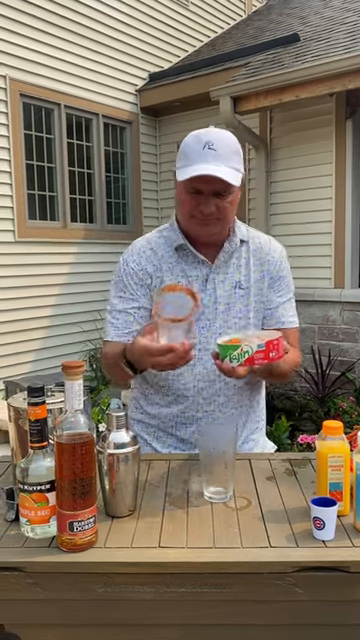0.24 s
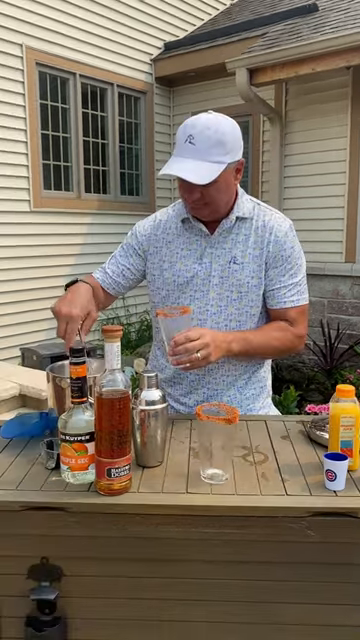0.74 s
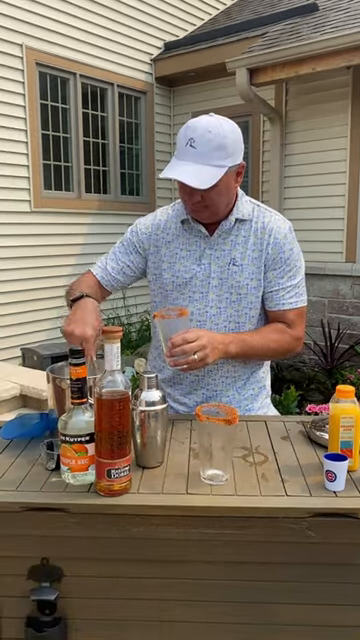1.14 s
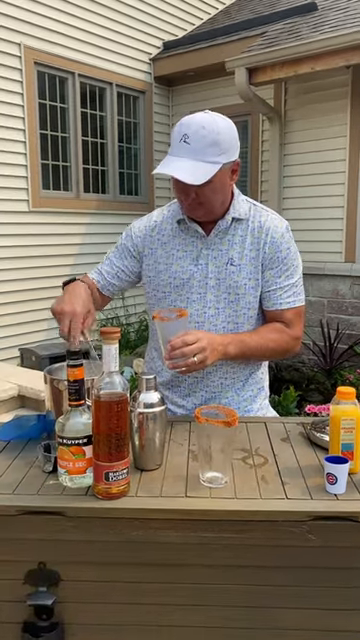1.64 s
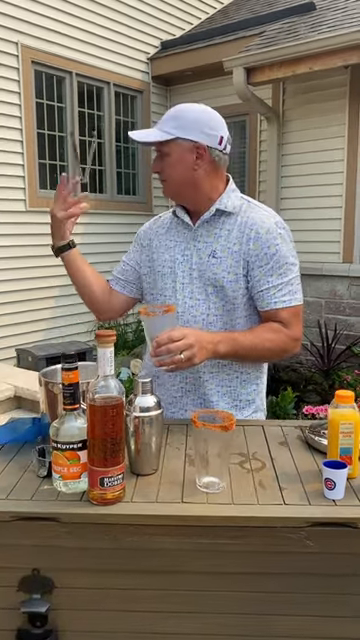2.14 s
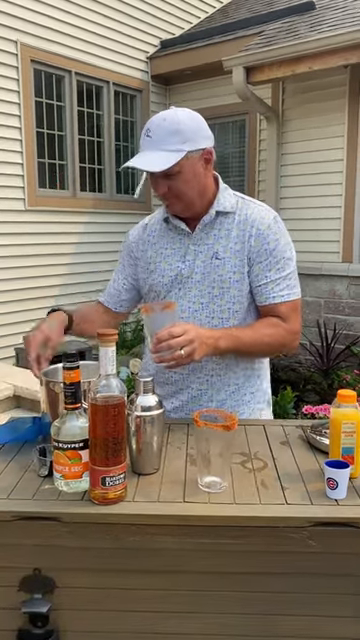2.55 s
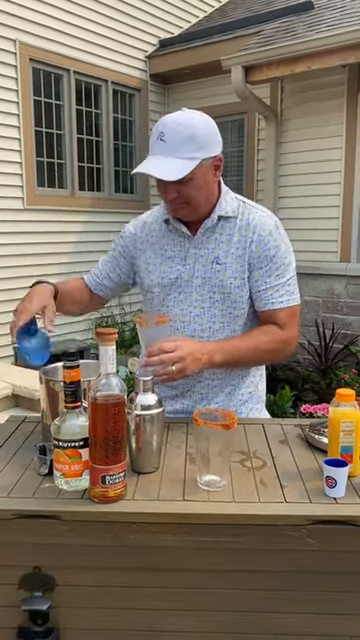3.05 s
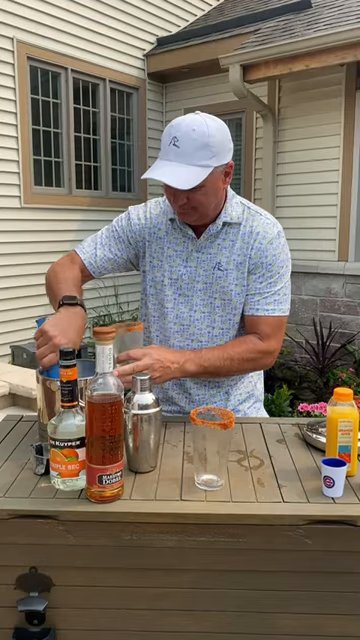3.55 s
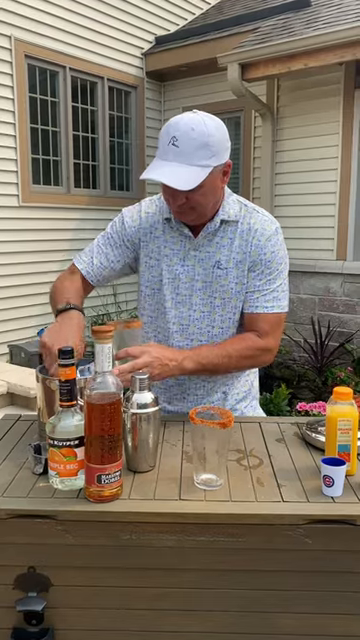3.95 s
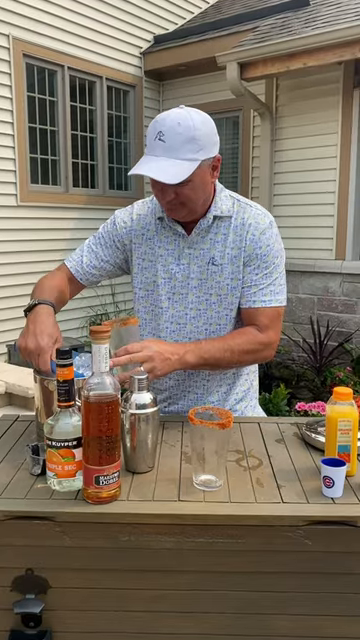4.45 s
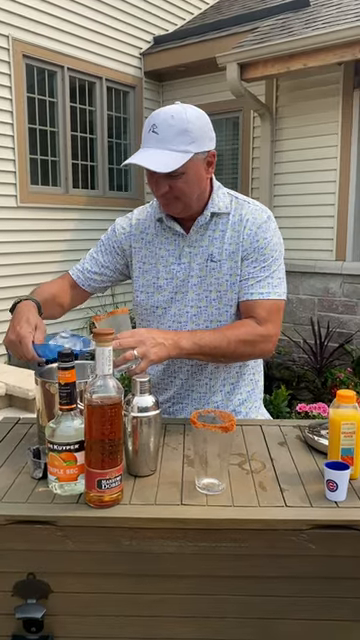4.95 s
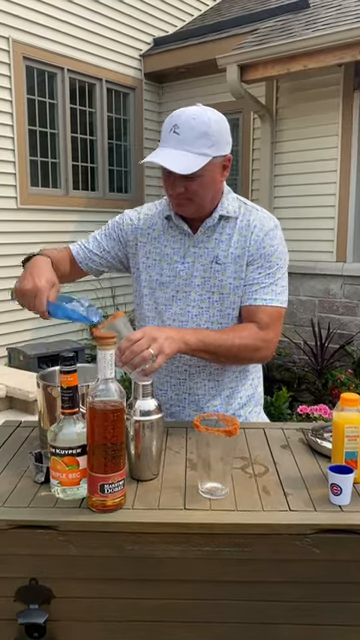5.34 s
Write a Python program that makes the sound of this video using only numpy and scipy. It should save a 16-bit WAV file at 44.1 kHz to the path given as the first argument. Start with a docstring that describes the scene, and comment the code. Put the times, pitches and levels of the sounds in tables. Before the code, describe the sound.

Steel tongs poke at ice cubes in a hollow bucket, get laid down with a ring, then a plastic scoop crunches loudly through the ice outdoors.

```python
"""Ice clatters in a bucket on an outdoor bar: steel tongs poke at the cubes, then a plastic scoop digs in.
Blows, grinding and clicks are noise bursts and short pings coloured by the resonances of bucket and scoop.
Between the two the tongs are laid aside and ring as decaying steel modes; at the end a cube drops in a glass.
Far engines drone as wavering harmonics over filtered-noise open air; the house wall answers faintly."""
import sys
import numpy as np
from scipy import signal
from scipy.fft import rfft, irfft, next_fast_len
from scipy.io import wavfile
from scipy.ndimage import map_coordinates

SR = 44100
rng = np.random.default_rng(int(sys.argv[2]) if len(sys.argv) > 2 else 0)


def wav_out(sig):
    """Save sig, one row per channel (or a flat mono array), as 16-bit PCM at SR to the path in sys.argv[1]."""
    wavfile.write(sys.argv[1], SR, np.round(np.clip(np.atleast_2d(sig).T, -1, 1) * 32767).astype(np.int16))


N = 246519
TOP_HZ = 15950  # upper limit of the whole sound

# the steel tongs meeting the table: [start_s, level_db]
TONG_TOUCHES = [(2.999, -12), (3.014, -5), (3.032, 1), (3.055, -11), (3.091, -5.5), (3.21, -13)]


def amp(db):
    """Decibels to gain."""
    return 10 ** (np.asarray(db) / 20)


def unit(x):
    """Scaled to rms 1."""
    return x / np.sqrt(np.mean(x ** 2) + 1e-20)


def along(points, hz):
    """A curve of (Hz, value) points, read on a log frequency axis."""
    f, v = np.transpose(points)
    return np.interp(np.log(hz + 1), np.log(f + 1), v)


def curve(points):
    """A curve of (s, value) points, read at every sample."""
    s, v = np.transpose(points)
    return np.interp(np.arange(N) / SR, s, v)


def wobble(rate):
    """A smooth random curve, rate knots a second."""
    knots = rng.standard_normal(int(N * rate / SR) + 4)
    return map_coordinates(knots, [np.arange(N) * rate / SR])


def filtered(x, response):
    """x shaped by a complex response of frequency."""
    n = x.shape[-1]
    m = next_fast_len(n + SR // 8)
    return irfft(rfft(x, m) * response(np.fft.rfftfreq(m, 1 / SR)), m)[..., :n]


def resonance(f, hz, width):
    """Causal response of one mode, 1 at its pitch."""
    return 1j * f * width / (hz * hz - f * f + 1j * f * width)


def add(track, s, sound):
    """Mixes a sound into the track from time s."""
    part = track[max(round(s * SR), 0):][:len(sound)]
    part += sound[:len(part)]


def overlap(starts, pings):
    """Lays one ping at each start (0 to 1 of the whole length) and levels the stream to rms 1."""
    at = (starts * N).astype(int) + np.arange(pings.shape[1])
    return unit(np.bincount(at.ravel(), pings.ravel(), N)[:N])


def knocks(clack_db=-8, note_db=-11, thump_db=5, splinter_db=-27):
    """Each blow: cubes clack with one leading pitch, a little ice splinters, the hollow bucket thumps."""
    # blows with the tongs, then the scoop; levels before the layer gains, treble against the usual hardness:
    # [start_s, level_db, thump_relative_db, treble_relative_db, leading_pitch_hz]
    blows = [ (0.415, -29, 2, -20, 1050), (0.423, -32, 5, -14, 2100), (0.448, -33, 0, -21, 1740),
             (0.585, -35, -9, -16, 2220), (0.65, -38.5, 5, -27, 1750), (0.813, -27.5, -13, -17, 1980),
             (0.946, -28.5, -3, -14, 2500), (0.982, -24, -24, -10, 3584), (0.996, -21.5, 4, -15, 1740),
             (1.019, -27, 3.5, -20, 1776), (1.049, -25.5, -14, -9, 2100), (1.109, -29.5, -18, -22, 1715),
             (1.486, -37, -19, -11, 1740), (1.505, -21.5, -8, -20, 2110), (1.529, -23, -12.5, -17, 1687),
             (1.57, -33, -11, -15, 2080), (1.603, -28.5, -5, -16, 1720), (1.627, -29, -14, -17, 1740),
             (1.676, -28.5, -14, -10, 1690), (1.695, -34, -14, -18, 2080), (1.749, -30.5, -1, -15, 2850),
             (1.766, -34, -10, -17, 1740), (1.91, -27, 0, -10, 1044), (3.39, -17.5, -28, -14.5, 1480),
             (3.431, -8.5, -13, -18.5, 1357), (3.44, -19.5, -1, -29, 1380), (3.454, -13, -1, -26, 1616),
             (3.48, -16.5, 3.5, -24, 1412), (3.494, -19, -3.5, -19, 1620), (3.508, -25.5, 4, -21, 2030),
             (3.555, -21.5, -21, -21, 1545), (3.569, -19, -13.5, -11, 1520), (3.584, -17.5, -9, -20, 1380),
             (3.61, -19, -0.5, -23, 1820), (3.646, -13, -9, -29, 1380), (3.652, -14.5, -2.5, -14, 1590),
             (3.671, -12.5, -3, -15, 1290), (3.689, -11, -10, -20, 1320), (3.702, -12, -11, -25, 1357),
             (3.711, -16.5, -10, -16, 2010), (3.765, -15.5, -16, -20.5, 1414), (3.846, -27, -9, -19, 2480),
             (3.883, -23, -12, -19, 2900), (3.923, -20, -18, -14, 2090), (3.944, -19.5, -4.5, -10, 1330),
             (3.984, -19.5, -16, -17, 1074), (4.008, -8, -22, -11.5, 1746), (4.017, -12, -25, -9, 4000),
             (4.029, -13.5, -28, -13, 1760), (4.075, -22, -20, -11, 2700), (4.102, -16, -31, -16, 1690),
             (4.112, -18, -22, -11, 2940), (4.157, -23, 2.5, -17, 1510), (4.2, -29.5, -1, -31, 1160),
             (4.223, -29, -14, -20, 1460), (4.249, -23, -19, -18.5, 1300), (4.256, -26.5, -20, -10.5, 2750),
             (4.312, -31, -16, -15, 1440), (4.349, -24, -25, -17, 1555), (4.369, -25, -24, -16, 2090),
             (4.384, -24.5, -6, -19, 1160), (4.395, -23.5, -7, -19, 1126), (4.438, -30.5, 1, -22, 2910),
             (4.47, -33, -12, -20, 1140), (4.485, -28.5, -14, -15, 1240), (4.511, -29.5, -13, -11, 2710),
             (4.531, -30.5, -5, -13, 2120), (4.574, -37, -10, -23, 1100), (4.685, -27.5, -14, -25, 1154),
             (4.701, -36, -14, -18, 1740), (4.796, -33.5, -19, -10, 3330), (4.967, -34, -29, -13.5, 1400),
             (4.976, -33.5, -23.5, -15, 1730), (5.099, -29.5, 2, -6, 1060), (5.119, -27, -0.5, -18.5, 1084),
             (5.15, -30.5, -11, -10, 2150), (5.183, -32, -14, -13, 1350), (5.211, -31, -16, -10, 3040),
             (5.226, -20.5, -6.5, -13, 1090), (5.242, -31, 8, -3, 2120), (5.251, -19.5, -20, -6, 2477),
             (5.369, -33.5, -20, -14, 1720), (5.44, -28.5, -33, 4, 3120), (5.46, -31.5, -25, 4, 3380),
             (5.48, -29.5, -21, -6, 1407), (5.505, -28, -28, 0, 3120)]
    # the air in the bucket: [pitch_over_lowest_note_ratio, level_db]
    hollow_modes = [(0.999, -0.5), (1.4, -12), (1.72, -20)]
    clack_t60, snap_t60, note_t60, thump_t60 = 0.06, 0.0034, 0.11, 0.054  # s
    usual_hardness_db, note_scatter = -15, 0.028  # scatter: share of the hollow's pitch
    treble = [(1500, 0), (3500, 1.0)]  # (Hz, share of the hardness in dB)
    out, t = np.zeros(N), np.arange(SR // 8) / SR
    rise = 1 - np.exp(-t / 0.00049)
    for s, db, low, hard, note_hz in blows:
        decay = amp(-60 * t / clack_t60) + amp(-60 * t / snap_t60)
        strike = rng.standard_normal(len(t)) * decay * rise

        # a harder contact is richer in treble
        def colour(f):
            return in_bucket(f, s, scatter_db=4.0) * amp((hard - usual_hardness_db) * along(treble, f))

        clack = filtered(strike, colour)
        clack = clack / np.std(clack[:SR // 100])  # levelled by its first 10 ms
        note = np.sin(2 * np.pi * note_hz * t) * amp(-60 * t / note_t60) * rise
        hz = bucket_state(s)[0] * (1 + note_scatter * rng.standard_normal())
        boom = sum(amp(level - 60 * t * ratio / thump_t60) * np.sin(2 * np.pi * ratio * hz * t)
                   for ratio, level in hollow_modes)
        thump = boom * (1 - np.exp(-t / 0.0016))
        blow = amp(clack_db) * clack + amp(note_db) * note
        blow = blow + amp(splinter_db) * splinter(t) + amp(low + thump_db) * thump
        add(out, s, amp(db) * blow)
    return out


def rattle(rattle_db=-2.5, rumble_db=-7.5, clump_db=1.0, clumps_per_s=70):
    """Pushes swell and settle: cubes slip in clumps, grind and click, and the bucket's hollow rumbles."""
    # tongs poke, scoop digs in three times, load settles, is lifted and slides; levels before the layer gains:
    # [peak_s, rattle_db, swell_s, settle_s, rumble_relative_db]
    pushes = [ (0.427, -37.5, .015, 0.14, 8.5), (0.61, -48.5, 0.06, 0.3, 9), (0.82, -44, 0.088, 0.045, 14),
              (0.957, -31.5, .013, 0.11, 0), (1.0, -29.5, 0.054, 0.14, 5.5), (1.53, -26.5, 0.044, 0.049, 3),
              (1.75, -41, 0.51, 0.098, 5), (3.402, -23, 0.011, 0.18, -5), (3.46, -23.5, 0.032, 0.097, 6),
              (3.6, -25, 0.097, 0.21, 3), (3.7, -19, .1, 0.11, 0.5), (3.89, -26.5, 0.052, 0.52, -5),
              (4.012, -21.5, .18, 0.28, -5), (4.02, -16, .025, 0.037, -14), (4.115, -24, .04, 0.11, -11),
              (4.262, -33.5, 0.016, 0.087, -13), (4.4, -33, 0.098, 0.16, 3), (4.525, -36, 0.07, 0.29, -2),
              (4.71, -41, 0.1, 0.99, -1), (5.235, -30, .035, 0.073, -5), (5.51, -36, 0.21, 0.13, -20)]
    push_range_db = 19.5  # gained over each swell time, lost over each settle time
    click_share = 0.42  # of the rattle's power
    contacts = np.array([collisions(rate=5000, t60=0.011), cube_clicks()])
    out = np.zeros(N)
    for s, db, swell, settle, low in pushes:
        t = np.arange(-round(1.3 * swell * SR), round(2 * settle * SR)) / SR
        effort = amp(db - push_range_db * np.maximum(-t / swell, t / settle))
        cubes = np.roll(contacts, rng.integers(N), axis=1)[:, :len(t)]
        grind, clicks = filtered(cubes, lambda f: in_bucket(f, s, scatter_db=1.0))
        jostle = np.sqrt(1 - click_share) * unit(grind) + np.sqrt(click_share) * unit(clicks)
        hollow_hz, width, *_ = bucket_state(s)
        noise = rng.standard_normal(N)[:len(t)]
        hollow = unit(filtered(noise, lambda f: resonance(f, hollow_hz, width) ** 2))
        add(out, s + t[0], effort * (amp(rattle_db) * jostle + amp(low + rumble_db) * hollow))
    return out * amp(clump_db * wobble(clumps_per_s))


def collisions(rate, t60):
    """A stream of tiny grinding contacts, each a ping of some 4 ms at its own pitch."""
    u = rng.random((int(rate * N / SR), 3))
    t = np.arange(SR // 245) / SR
    hz = TOP_HZ * u[:, 1:2] ** 2
    size = np.sqrt(u[:, 1:2])  # high pings are rarer and stronger
    pings = size * np.exp(-np.log(1000) * t / t60) * np.sin(2 * np.pi * (hz * t + u[:, 2:3]))
    return overlap(u[:, :1], pings)


def cube_clicks(count=3, per_s=200, t60=0.035, spread_db=3.5):
    """A stream of whole cubes clicking together, each ringing briefly at a few pitches of its own."""
    # range in which a cube rings: [lowest_hz, highest_hz]
    click_hz = (997, 6486)
    u = rng.random((int(per_s * N / SR), 2 + count))
    t = np.arange(SR // 40) / SR
    hz = click_hz[0] * (click_hz[1] / click_hz[0]) ** u[:, 2:, None]
    size = amp(spread_db * np.minimum(-np.log(1 - u[:, 1:2]), 2))  # few clicks are much stronger
    tones = np.sum(np.sqrt(hz) * np.sin(2 * np.pi * hz * t), axis=1)
    return overlap(u[:, :1], size * amp(-60 * t / t60) * tones)


def in_bucket(f, s, scatter_db):
    """The colour of clattering ice at time s: bucket walls and scoop add their resonances to it."""
    # spectrum of the clatter: [frequency_hz, level_db_per_hz]
    clatter = [(100, -7), (200, 1), (330, -2), (460, -2.5), (620, 4.5), (1000, 0), (2000, 0), (3000, -0.5),
               (4100, -2.5), (5000, -8.5), (6500, -7.5), (9000, -13.5), (12000, -16.5), (15500, -23)]
    # bucket walls, then upper modes of the plastic scoop; levels before their ring at time s:
    # [pitch_hz, width_hz, level_db]
    wall_modes = [(952, 34, -2.5), (1092, 81, -2), (1729, 53, 0.5), (2065, 47, 2.5), (2645, 28, -1.5),
                  (2895, 51, -3.5), (3360, 32, -2), (4015, 31, 2), (5140, 210, -5.5)]
    scoop_modes = [(2820, 62, -2.5), (4100, 82, -5)]
    _, _, scoop_hz, scoop_db, wall_db = bucket_state(s)
    modes = [(hz, width, db + wall_db) for hz, width, db in wall_modes]
    lowest = (scoop_hz, 160, 0)  # pitch Hz, width Hz, dB
    modes += [(hz, width, db + scoop_db) for hz, width, db in [lowest, *scoop_modes]]
    sizes = scatter_db * rng.standard_normal(len(modes))
    ringing = sum(amp(db + size) * resonance(f, hz, width)
                  for (hz, width, db), size in zip(modes, sizes))
    return amp(along(clatter, f)) * (1 + ringing)


def bucket_state(s):
    """Resonances at time s: hand and scoop narrow the mouth, lowering its note; a filling scoop sinks."""
    # [time_s, hollow_pitch_hz, hollow_width_hz, scoop_pitch_hz, scoop_ring_db, wall_ring_db]
    states = [(1.9, 490, 126, 1370, -25, -4), (3.39, 468, 90, 1440, 4, -10),
              (3.77, 457, 90.5, 1350, -12, -2), (4.01, 435, 110, 1300, 3, -4), (4.16, 416, 65, 1210, 4, 1),
              (4.7, 430, 64, 1170, -4, -12), (5.1, 499, 122, 1070, -7, -11)]
    times, *cols = np.transpose(states)
    return [np.interp(s, times, c) for c in cols]


def splinter(t, t60=0.09):
    """The brief hiss of ice chipping: noise strongest between about 6 and 10 kHz."""
    hiss = [(2500, -36), (6000, 6.5), (10000, 5.5), (16000, -6.0)]  # (Hz, dB)
    chips = unit(filtered(rng.standard_normal(len(t)), lambda f: amp(along(hiss, f))))
    return chips * amp(-60 * t / t60) * (1 - np.exp(-t / 0.0012))


def cracks():
    """A few times a cube splits with a bright snap of hiss."""
    # [start_s, level_db]
    splits = [(3.43, -25.5), (3.799, -35), (3.879, -34), (4.008, -25), (4.485, -31), (4.838, -40.5),
              (5.251, -29)]
    out, t = np.zeros(N), np.arange(SR // 8) / SR
    for s, db in splits:
        add(out, s, amp(db) * splinter(t))
    return out


def tongs(ring_db=-38.0, shimmer_db=-27.5, tap_db=-34, tips_db=-36):
    """The tongs slide onto the table and bounce; their two arms beat, and the tips clink once more."""
    # modes of the steel, of the tips and of the wooden top, before the layer gains: [pitch_hz, level_db, t60_s]
    steel_modes = [(1124, -16.5, 3.9), (2003, -4, 1.0), (2790, -8.5, 1.4), (3709, -10, 3.4),
                   (4750, -7.5, 1.6), (4899, -11, 0.6), (5329, -3, .7), (6000, 5.5, 0.9), (6379, -4, .26),
                   (6770, 4, 0.74), (8380, 8, 0.35), (8750, 8, 0.4), (9600, -3, .32), (10380, 2, 0.61),
                   (10850, 1, 0.44), (11340, -3, 0.82), (11930, 1, 0.56), (12330, 4, 0.55),
                   (15240, 12, .29), (15320, 14, .31), (15525, 16, 0.36), (15635, 12, .33),
                   (15720, 11, .33)]
    tip_modes = [(4240, 0, 0.23)]
    wood_modes = [(276, 3.5, 0.1), (540, 11, 0.031), (673, 10, 0.034)]
    # the tips touching: [start_s, level_db]
    tip_touches = [(3.091, -5), (3.108, 0)]
    steel = ring(steel_modes, TONG_TOUCHES, attack=0.005, blur_hz=2, flutter_db=2.2, twin=0.5)
    tips = ring(tip_modes, tip_touches, attack=0.004, blur_hz=2)
    wood = ring(wood_modes, [(3.006, 0)], attack=0.0032, blur_hz=5)
    metal = amp(ring_db) * steel + amp(shimmer_db) * shimmer() + amp(tips_db) * tips
    return metal + amp(tap_db) * wood


def shimmer(t60=0.24, scrape_db=-9, scrape_t60=0.089, count=90):
    """The many weak, inharmonic modes of thin steel, over the brief scrape of each touch."""
    # spectrum of the weak modes and of the scrape: [frequency_hz, level_db]
    sheen = [(400, -6), (1500, -9), (5000, -0.5), (10000, -2), (14200, 3), (15000, -1), (15800, -3)]
    out, t = np.zeros(N), TONG_TOUCHES[0][0] + np.arange(SR // 2) / SR
    u = rng.random((count, 2))
    hz = TOP_HZ * (np.arange(count)[:, None] + u[:, :1]) / count
    partials = amp(along(sheen, hz)) * np.sin(2 * np.pi * (hz * t + u[:, 1:]))
    modes = unit(np.sum(partials, axis=0))
    noise = rng.standard_normal(len(t))
    scrape = unit(filtered(noise, lambda f: amp(along(sheen, f)) * (f < TOP_HZ)))
    add(out, t[0], modes * fading(TONG_TOUCHES, t, t60, attack=0.001)
        + amp(scrape_db) * scrape * fading(TONG_TOUCHES, t, scrape_t60, attack=0.0011))
    return out


def ring(modes, touches, attack, blur_hz, flutter_db=0, flutters_per_s=45, twin=0):
    """One second of an object's modes under its touches; phases and levels stray, a twin arm beats."""
    arm_detune, arms_free_s = 0.002, 3.08  # pitch difference as a share; both arms swing freely from here
    out, t = np.zeros(N), touches[0][0] + np.arange(SR) / SR
    hz, db, t60 = np.transpose(modes)[:, :, None]
    steps = rng.standard_normal((len(modes), len(t)))
    stray = np.cumsum(steps, axis=1) * np.sqrt(blur_hz / (2 * np.pi * SR))
    flutter = flutter_db * np.array([wobble(flutters_per_s)[:len(t)] for _ in modes])
    phase = 2 * np.pi * (hz * (t - t[0]) + stray)
    lead = 2 * np.pi * arm_detune * hz * np.maximum(t - arms_free_s, 0)
    pair = (np.sin(phase) + twin * np.sin(phase + lead)) / (1 + twin)
    add(out, t[0], np.sum(amp(db + flutter) * fading(touches, t, t60, attack) * pair, axis=0))
    return out


def fading(touches, t, t60, attack):
    """The envelope of a ringing object: every touch feeds it energy, which then dies away."""
    ages = [(np.maximum(t - s, 0), db) for s, db in touches]
    energy = sum((amp(db - 60 * age / t60) * (1 - np.exp(-age / attack))) ** 2 for age, db in ages)
    return np.sqrt(energy)


def glass(glass_db=-25.5):
    """The first cube drops into the tumbler and bounces, ringing its modes."""
    # modes of the tumbler, before the layer gain: [pitch_hz, level_db, t60_s]
    tumbler_modes = [(1976, -2, .5), (2970, -16, 0.23), (4220, 3.5, 0.17), (5760, -13, 0.05)]
    # the cube touching: [start_s, level_db]
    cube_touches = [(5.561, -10), (5.575, 0)]
    return amp(glass_db) * ring(tumbler_modes, cube_touches, attack=0.00024, blur_hz=1)


def smeared(x, t60=0.054, drift_per_s=9, count=4):
    """A noise-smeared, slowly drifting copy of the sound, which makes left and right differ."""
    t = np.arange(SR // 20) / SR
    smears = rng.standard_normal((count, len(t))) * amp(-60 * t / t60)
    smears = smears / np.linalg.norm(smears, axis=1, keepdims=True)
    shares = np.array([wobble(drift_per_s) for _ in smears])
    copies = signal.fftconvolve(x[None], smears, axes=1)[:, :N]
    return np.sum(copies * shares / np.linalg.norm(shares, axis=0), axis=0)


def yard(x):
    """The house wall's answer: a noise tail 2.5 ms late, dying faster in the high treble."""
    # [frequency_hz, t60_s]
    decay = [(200, 0.38), (1500, 0.38), (5000, 0.4), (14000, 0.015)]
    hz, t, z = signal.stft(rng.standard_normal(SR // 3), SR, nperseg=256)
    tail = signal.istft(z * amp(-60 * t / along(decay, hz)[:, None]), SR, nperseg=256)[1]
    return signal.fftconvolve(np.pad(x, (SR // 400, 0)), tail / np.linalg.norm(tail))[:N]


def hum():
    """Two like engines beat slowly, a third comes and goes, and a deep drone lies under them."""
    # far engines, before their swells:
    # [firing_rate_hz, level_db, second_order_relative_db, third_order_relative_db]
    twin_engine = (111.5, -40.5, -10.5, -24)
    lone_engine = (132, -37.5, -15, -27.5)
    # swells of the lone engine and of the drone: [time_s, level_db]
    lone_swell = [(0, 1.5), (0.75, -6.5), (1.65, 4), (2.2, -12.5), (2.8, -7.5), (3.8, 1), (4.1, -20),
                  (4.5, 1.5), (4.85, -15), (5.59, 2.5)]
    drone_swell = [(0, -56), (0.7, -35.5), (1.8, -42), (2.75, -38), (3.15, -49), (3.55, -40), (4.7, -40.5),
                   (5.2, -36), (5.59, -46)]
    beat_s, loudest_s, twin_share = 1.22, 2.46, 0.41  # period, a moment in step, weaker over stronger
    rise_db, rise_s = 22, 0.55  # the pair swells in at first
    t = np.arange(N) / SR
    beat = np.abs(1 + twin_share * np.exp(2j * np.pi * (t - loudest_s) / beat_s))
    arriving = amp(-rise_db * np.maximum(1 - t / rise_s, 0))
    pair = arriving * beat * engine(*twin_engine, flutter_db=1.8, waver=0.0064)
    lone = amp(curve(lone_swell)) * engine(*lone_engine, flutter_db=1.5, waver=0.0073)
    drone = engine(59.5, curve(drone_swell), flutter_db=2.0, waver=0.015)
    return pair + lone + drone


def engine(hz, db, *overtones_db, flutter_db, waver):
    """A far engine: a few orders of its firing rate, unsteady in the moving air."""
    pitch = hz * (1 + waver * wobble(12) + 0.004813 * wobble(0.98))
    turn = 2 * np.pi * np.cumsum(pitch) / SR
    orders = [amp(db + level + flutter_db * wobble(6)) * np.sin(k * turn + 2 * np.pi * rng.random())
              for k, level in enumerate([0, *overtones_db], 1)]
    return np.sqrt(2) * sum(orders)


def air(air_db=-40):
    """Steady outdoor rumble and hiss: filtered noise, partly unlike on left and right."""
    # spectrum before levelling: [frequency_hz, level_db_per_hz]
    spectrum = [(30, -16), (45, -13), (74, 6.5), (98, -4.5), (150, 5), (172, -6.5), (260, -8.5),
                (350, -13.5), (700, -14.5), (1700, -20), (2500, -19), (5800, -21), (7500, -23.5),
                (10500, -26.5), (13000, -28.5), (15500, -35.5)]
    # left-right likeness of the open air: [frequency_hz, likeness_0_to_1]
    air_alike = [(250, 0.98), (900, 0.68), (1800, 0.96), (3000, 0.51), (5500, 0.63), (7400, 1),
                 (15500, 0.79)]
    shared, apart = filtered(rng.standard_normal((2, N)), lambda f: amp(along(spectrum, f)))
    return amp(air_db) * unit(left_and_right(shared, apart, air_alike))


def left_and_right(shared, apart, alike):
    """Two channels, partly unlike each other and out of step by an amount that varies with pitch."""
    # phase by which the left leads: [frequency_hz, lead_rad]
    lead = [(2000, 0), (2800, 1.23), (3400, 0.82), (4400, 1.5), (5100, 0.06), (7000, 3), (8000, 3.5),
            (9800, 7.5), (11500, 5.5), (12800, 13), (14300, 30), (15700, -6)]

    def blend(f):
        angle = np.arccos(np.clip(along(alike, f), 0, 1)) / 2
        return np.array([np.cos(angle), np.sin(angle)])

    mid, side = filtered(np.array([shared, apart]), blend)
    return filtered(np.array([mid + side, mid - side]),
                    lambda f: np.exp(.5j * np.outer([1, -1], along(lead, f))))


def scene(wet_db=-15):
    """The bar in front, the neighbourhood behind."""
    # left-right likeness of near sounds: [frequency_hz, likeness_0_to_1]
    bar_alike = [(400, 0.97), (1900, 1), (2600, 0.62), (5500, 1), (15500, 1)]
    bar = knocks() + rattle() + cracks() + tongs() + glass()
    bar = bar + amp(wet_db) * yard(bar)
    stereo = left_and_right(bar, smeared(bar), bar_alike) + hum() + air()
    return stereo * amp([[-.3], [.3]])  # left a little softer, right a little louder


def record(dry):
    """Keeps nothing above the band limit."""
    return filtered(dry, lambda f: f < TOP_HZ)


dry = scene()
out = record(dry)
wav_out(out)
```